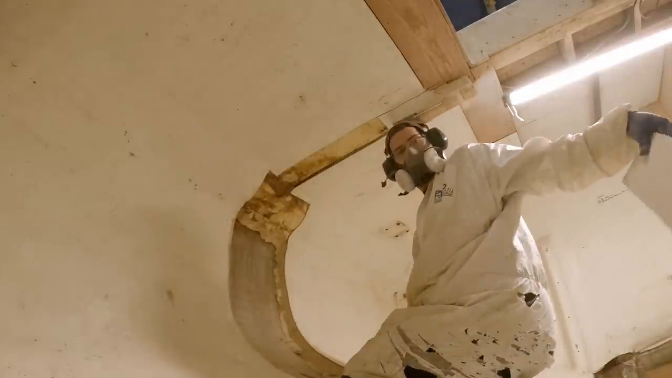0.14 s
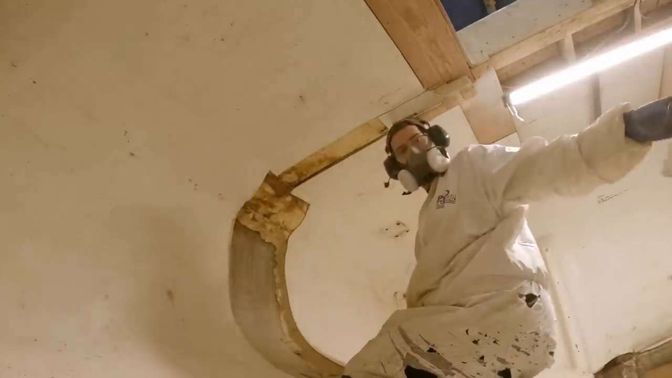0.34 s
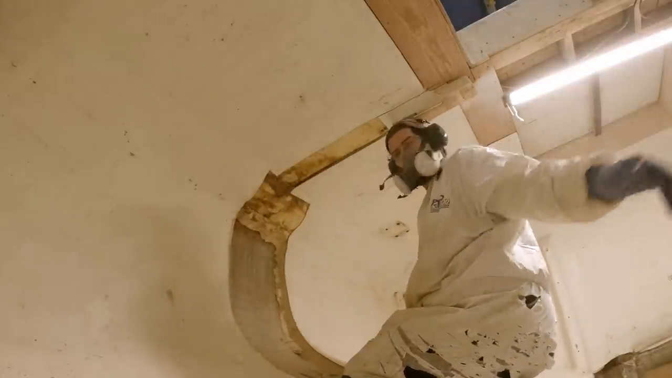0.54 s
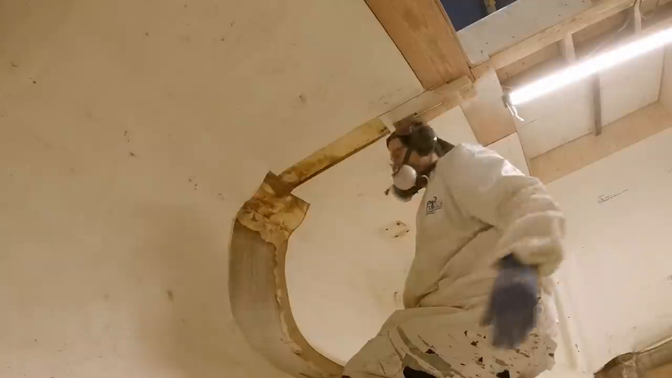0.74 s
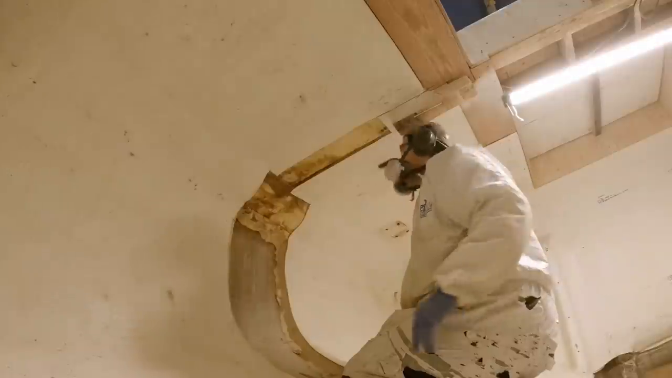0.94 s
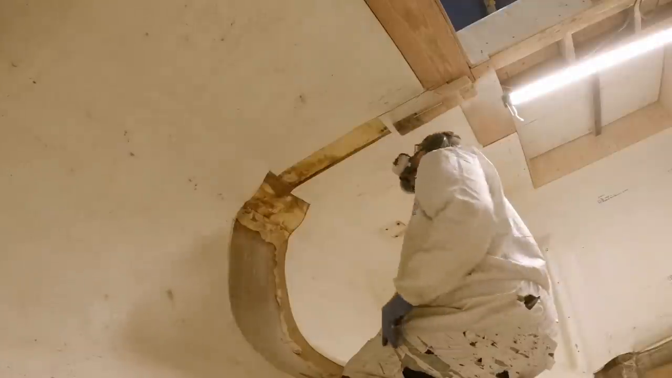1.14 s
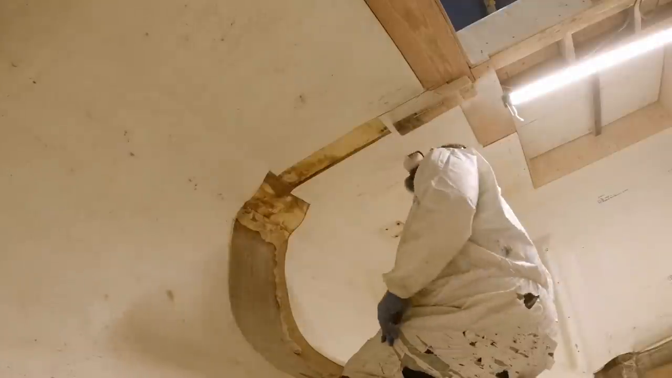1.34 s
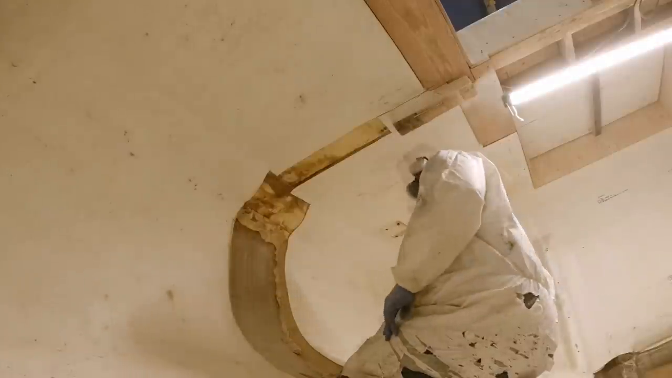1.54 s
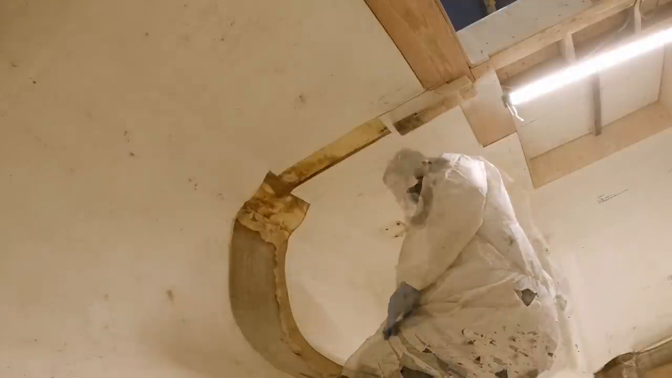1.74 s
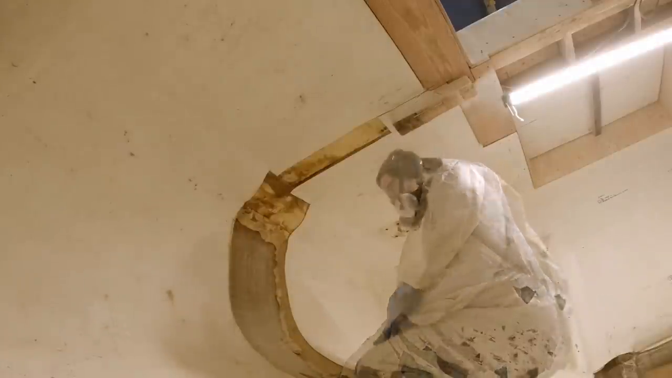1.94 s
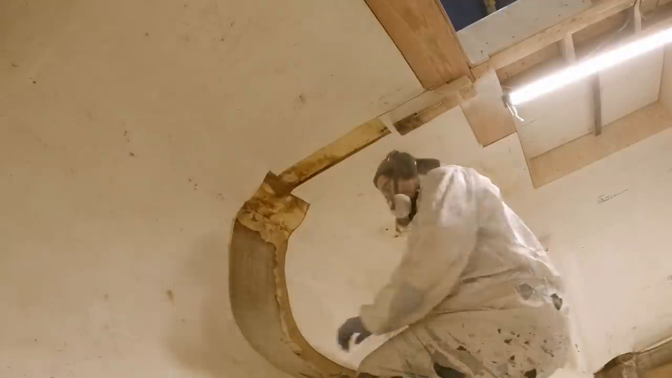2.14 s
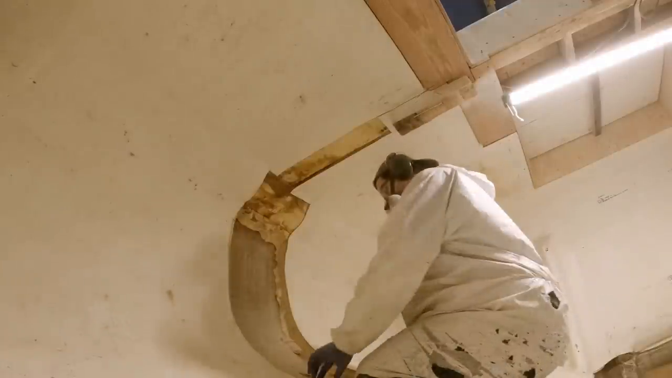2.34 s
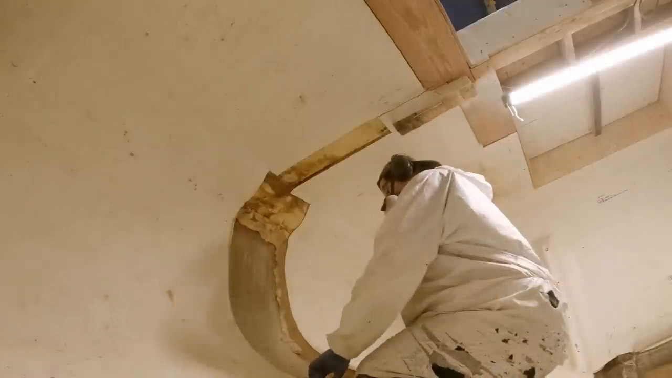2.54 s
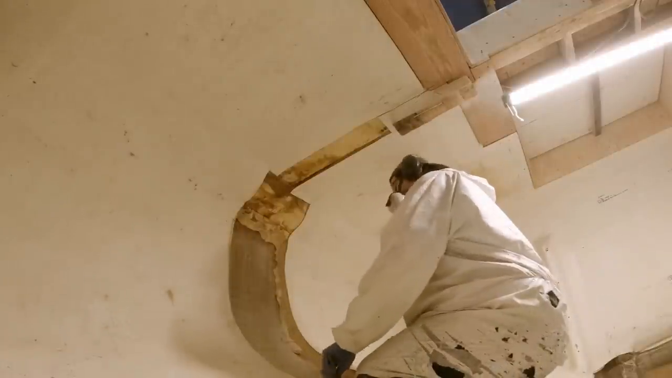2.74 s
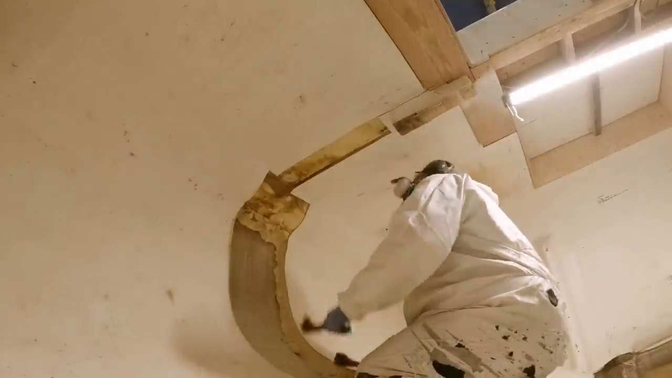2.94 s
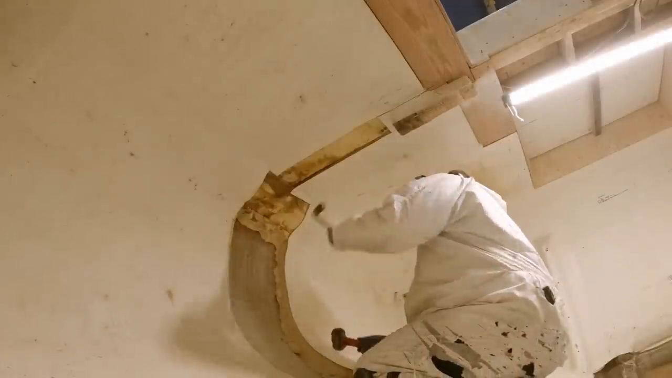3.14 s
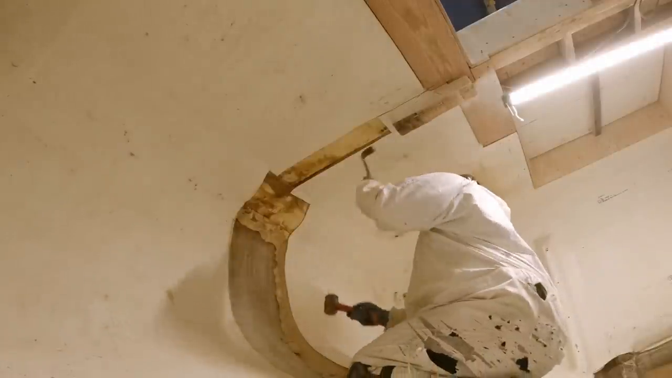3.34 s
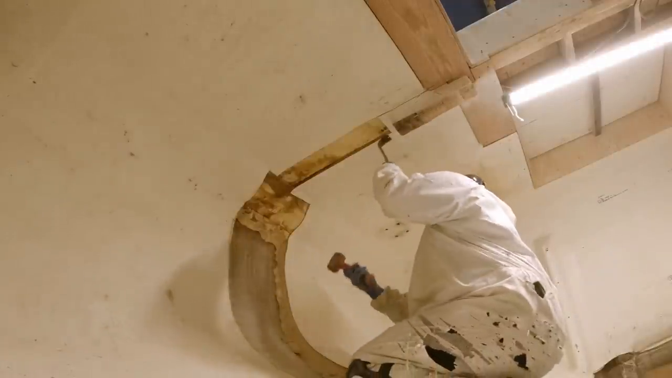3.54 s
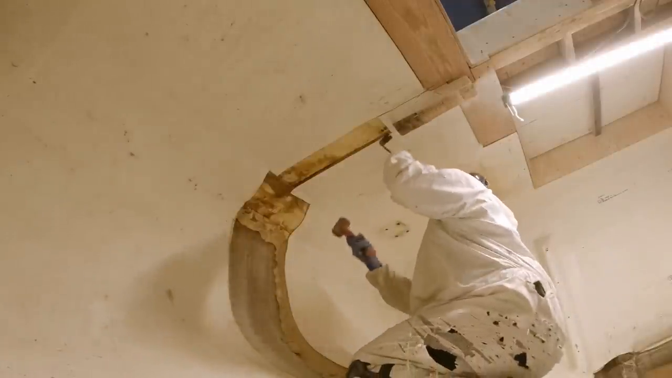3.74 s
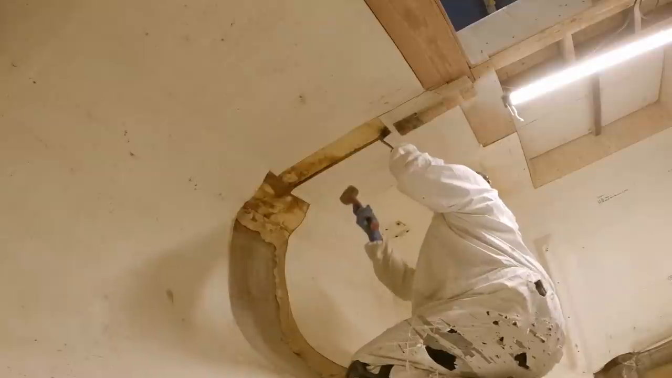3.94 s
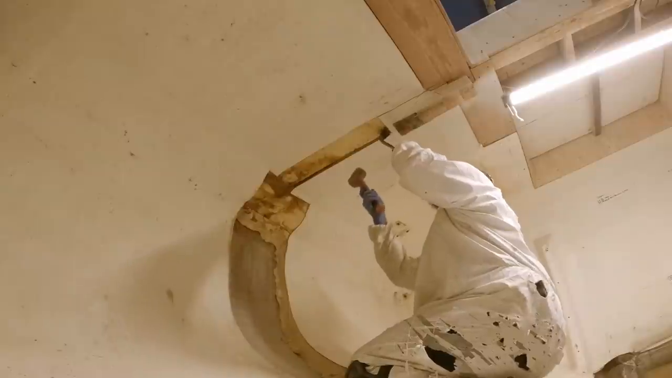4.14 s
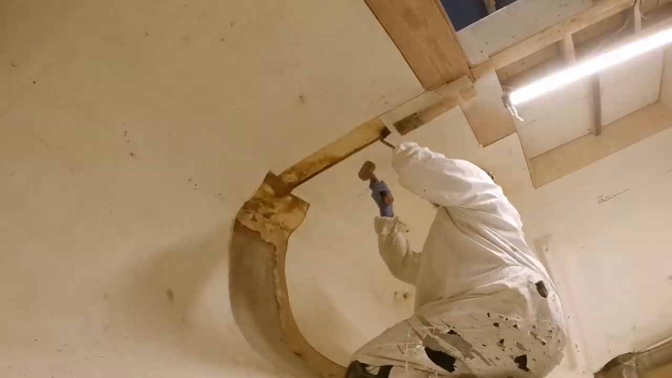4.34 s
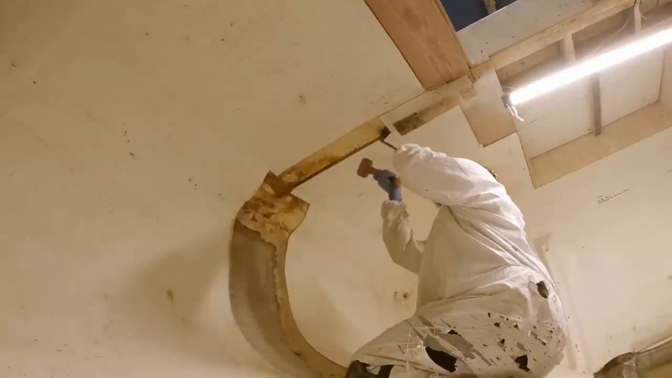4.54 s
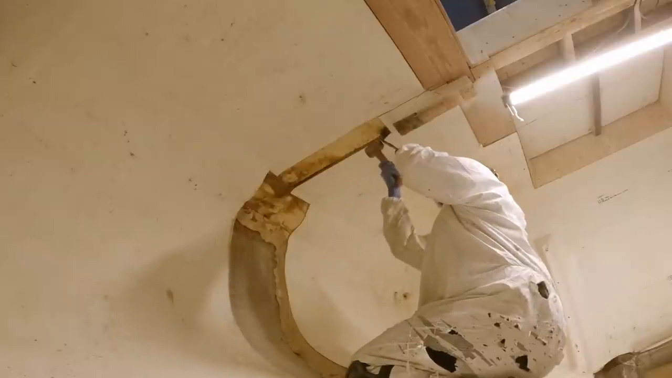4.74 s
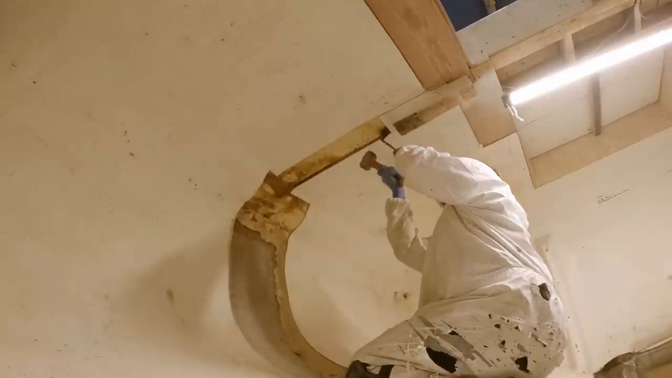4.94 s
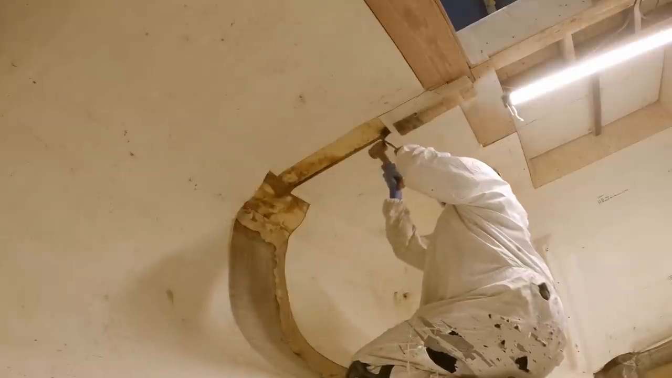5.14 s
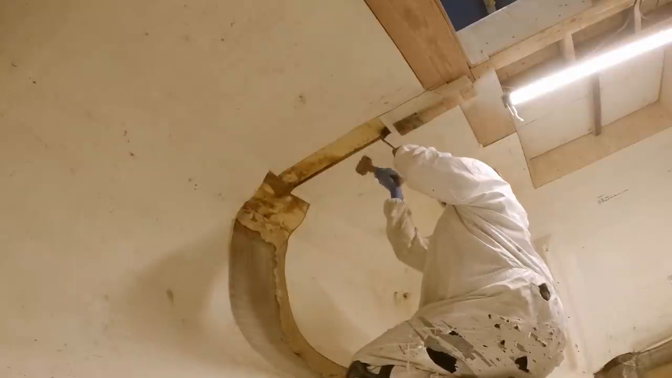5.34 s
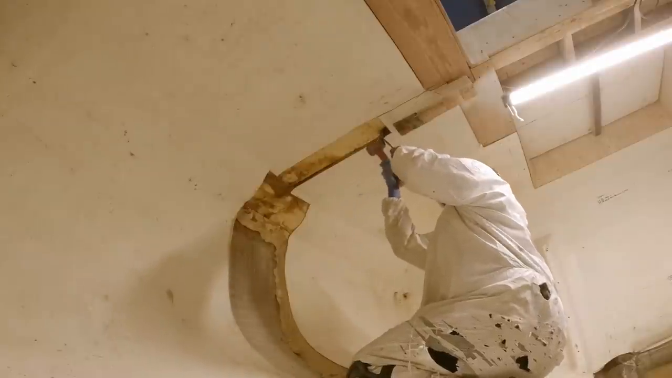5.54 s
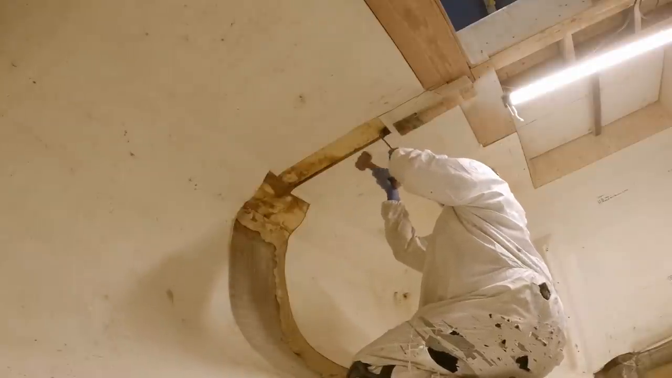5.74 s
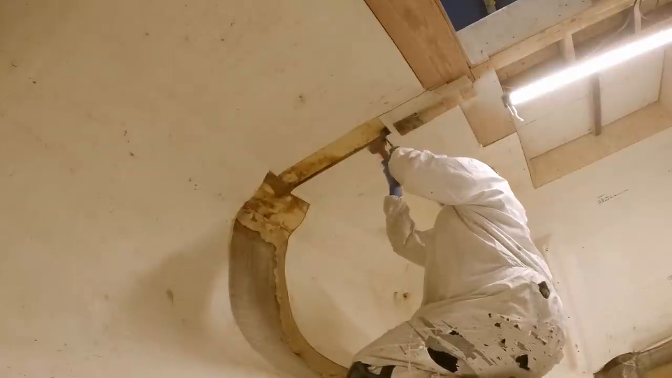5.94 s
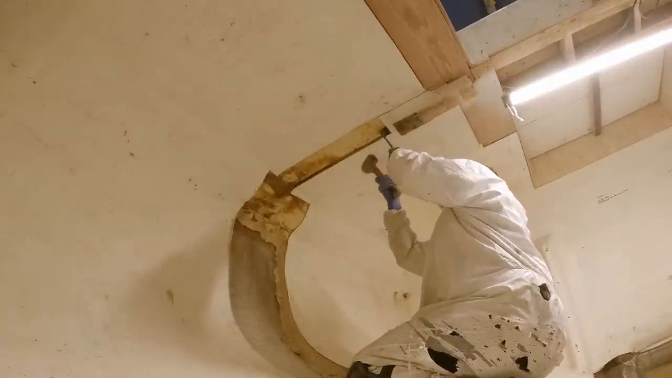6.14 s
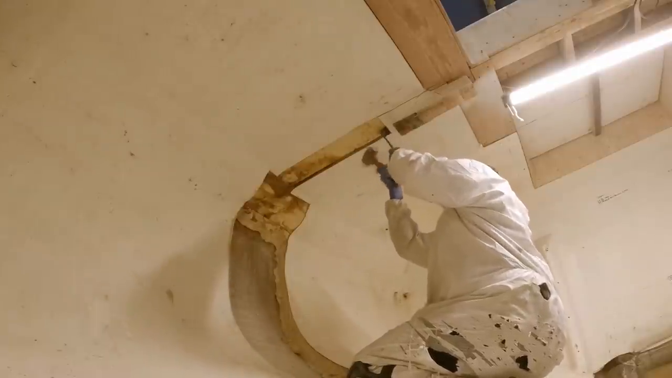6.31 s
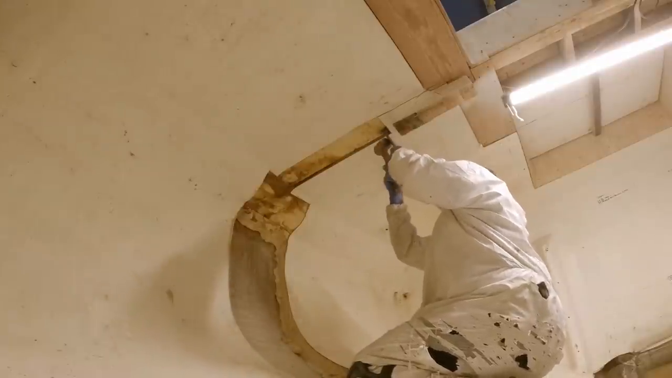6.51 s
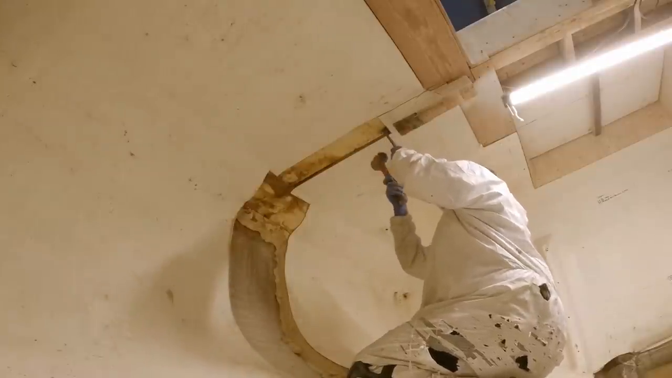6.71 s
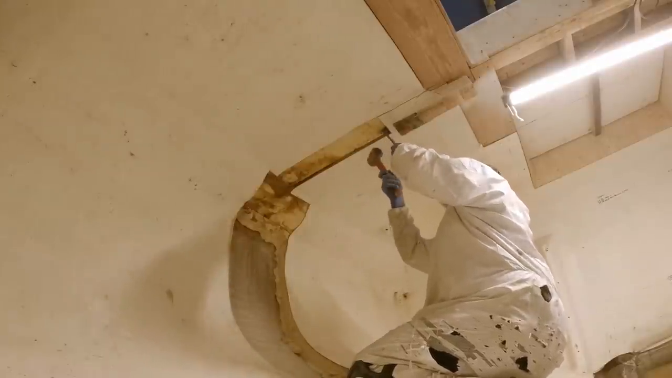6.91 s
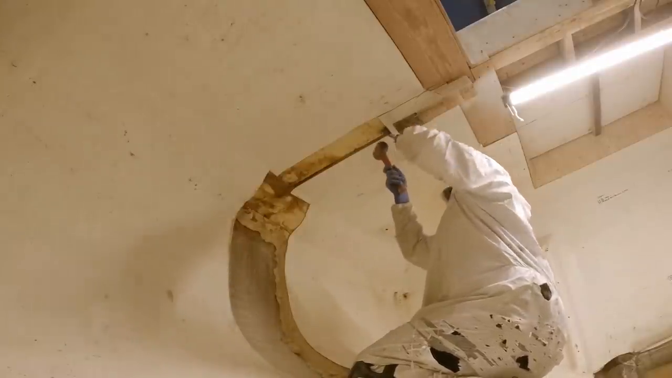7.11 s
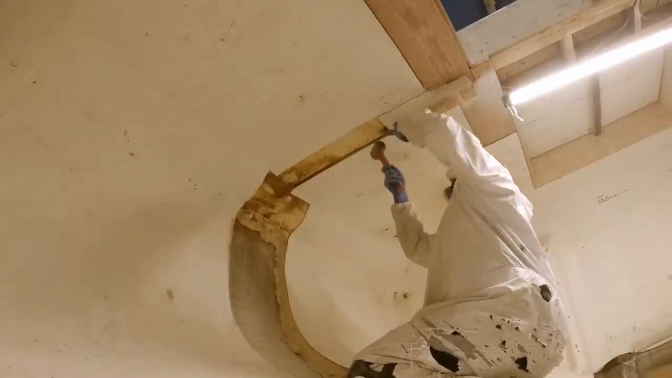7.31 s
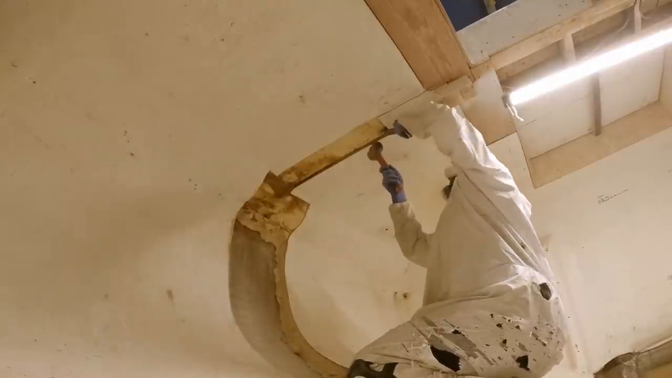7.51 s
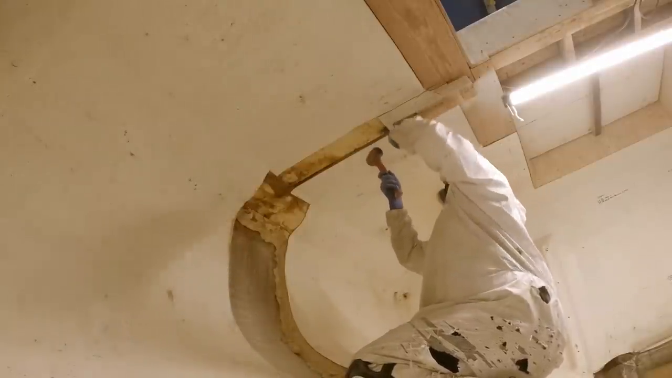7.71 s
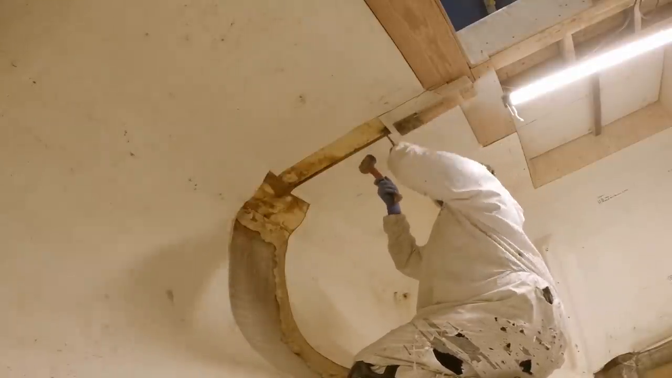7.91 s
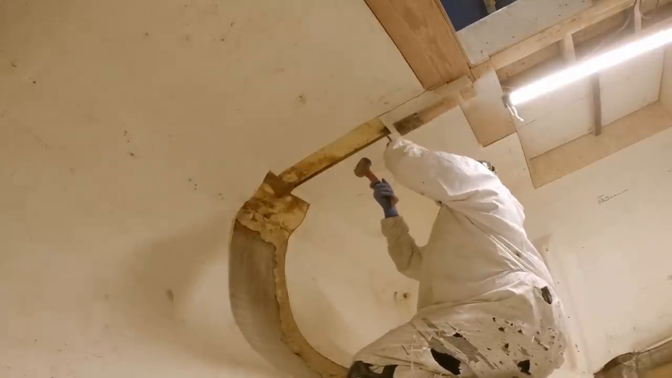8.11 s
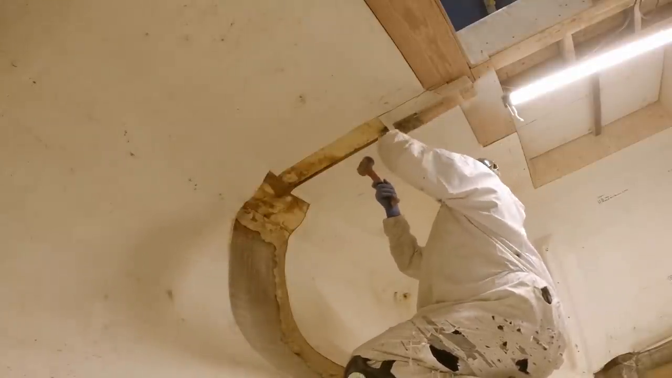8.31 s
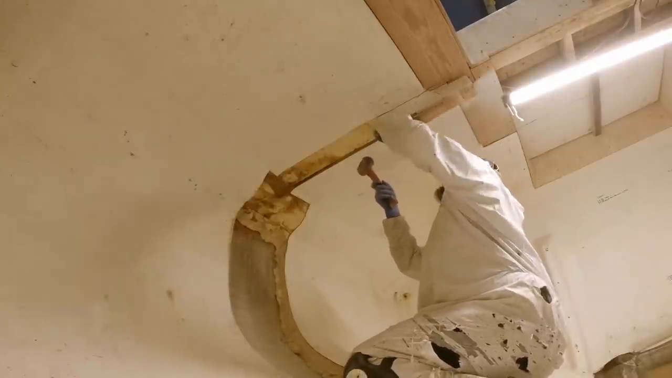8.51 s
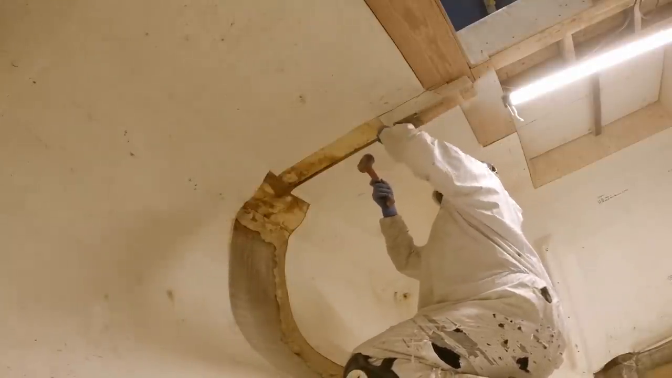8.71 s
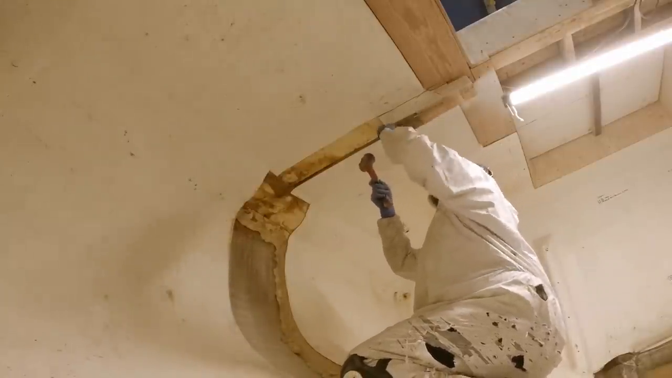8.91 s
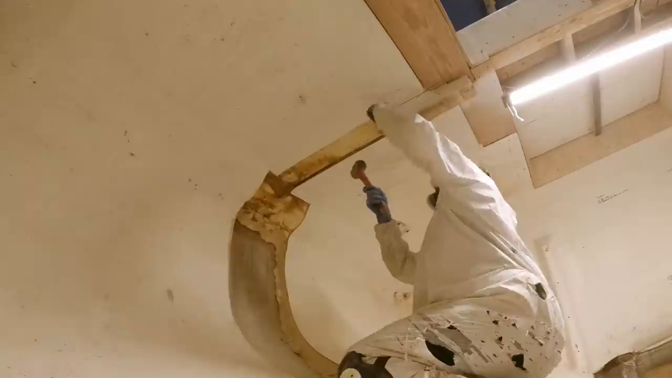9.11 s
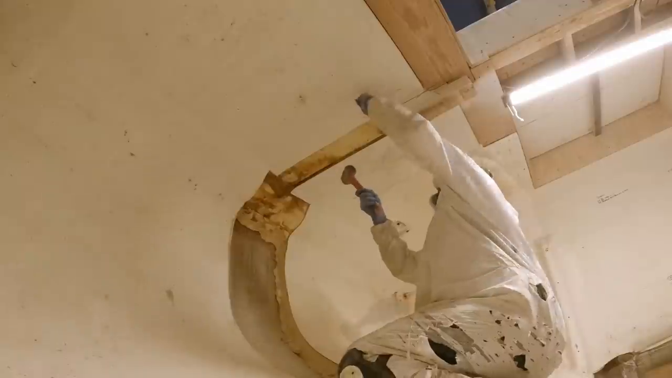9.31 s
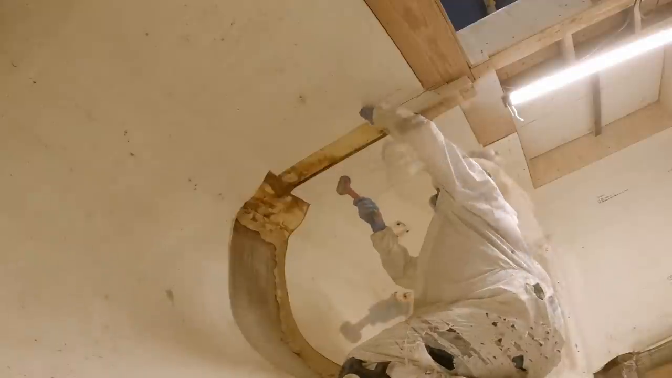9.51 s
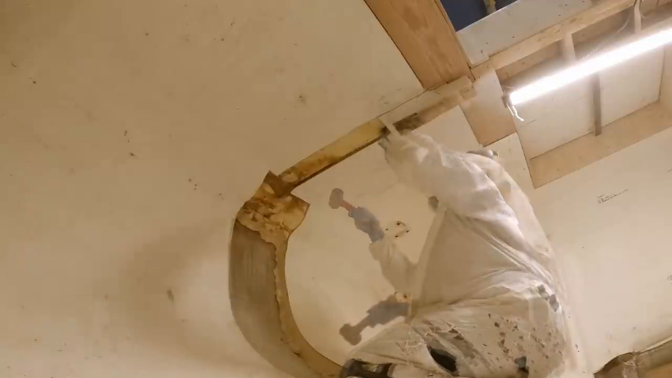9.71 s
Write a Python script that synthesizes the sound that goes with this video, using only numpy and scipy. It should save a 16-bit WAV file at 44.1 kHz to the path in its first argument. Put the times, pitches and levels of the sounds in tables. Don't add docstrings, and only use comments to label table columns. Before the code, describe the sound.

A low steady fan hum and thin rustle fill a hollow boat hull. A large light sheet slaps down with a boomy clatter, then dull bumps and a steel clink as tools are picked up. Five hard hammer blows on a chisel crack and ring, then gritty tearing, snaps and rips end with a slab landing. Close stereo microphone, loud tails squashed.

```python
import sys
import numpy as np
from scipy import signal
from scipy.fft import rfft, irfft, next_fast_len
from scipy.io import wavfile
from scipy.ndimage import uniform_filter1d

SR = 44100
rng = np.random.default_rng(int(sys.argv[2]) if len(sys.argv) > 2 else 0)


def bounce(signal):
    frames = np.transpose(np.atleast_2d(signal))
    limited = np.clip(frames, -1, 1)
    pcm = np.round(limited * 32767).astype(np.int16)
    wavfile.write(sys.argv[1], SR, pcm)


def makeup_ratio(level_db):
    decades = np.asarray(level_db, float) / 20
    return 10 ** decades


N = 434826


def evened(x):
    return x / np.sqrt(np.mean(x ** 2) + 1e-20)


def read(points, hz):
    f, value = np.transpose(points)
    return np.interp(np.log(hz + 1), np.log(f + 1), value)


def resonances(peaks, hz):
    return sum(makeup_ratio(db) / (1 + ((hz - f) / width) ** 2) for f, width, db in peaks)


def add(mix, s, sound):
    part = mix[..., round(s * SR):][..., :sound.shape[-1]]
    part += sound[..., :part.shape[-1]]


def coloured(x, gain):
    log_gain = np.log(gain(abs(np.fft.fftfreq(8192, 1 / SR))) + 1e-5)
    taps = np.fft.ifft(np.exp(np.conj(signal.hilbert(log_gain)))).real[:4096]
    return signal.oaconvolve(x, taps)


def burst(rise_s, decay_s, gain, wet_db):
    t = np.arange(10000) / SR
    push = rng.standard_normal(len(t)) * (1 - np.exp(-t / rise_s)) * np.exp(-t / decay_s)
    z = rfft(push, 2 * len(t))
    z /= np.sqrt(uniform_filter1d(abs(z) ** 2, size=140))
    push = irfft(z)[:len(t)]
    pulse = coloured(np.ones(1), gain)
    sound = signal.fftconvolve(push, pulse)[:len(t)]
    pulse = np.pad(pulse, (0, len(t) - len(pulse)))
    pulse = makeup_ratio(wet_db) * np.linalg.norm(push) * pulse
    return np.array([sound, pulse]) / abs(sound).max()


def ring(modes, seconds):
    t = np.arange(round(seconds * SR)) / SR
    return sum(makeup_ratio(db - 60 * t / t60) * np.sin(2 * np.pi * (hz * t + rng.random())) for hz, db, t60 in modes)


# pitch in Hz, left-right correlation.
LIKENESS = [(60, 1.0), (120, 1), (350, 0.97), (520, 0.82), (950, 0.79), (1890, 0.68), (3770, 0.67),
            (7520, 0.69), (15000, 0.1)]


def likeness(hz):
    ceiling = 1 - .017 * np.minimum(hz / 90, 1) ** 2
    return np.clip(read(LIKENESS, hz), 0, ceiling)[:, None]


def wash(gain, level_db, tilt_db, patchy_db):
    frames, hz = N // 512 + 5, np.fft.rfftfreq(2048, 1 / SR)
    a, b, c, d, patches = rng.standard_normal((frames, 1025, 5)).T
    patches = uniform_filter1d(patches, size=16, axis=0)
    patches = evened(uniform_filter1d(patches, size=6, axis=1))
    same, left = likeness(hz), a + 1j * b
    right = same * left + np.sqrt(1 - same ** 2) * (c + 1j * d)
    z = np.array([left, right])
    octaves = np.log2(np.maximum(hz, 1500) / 1500)[:, None]
    tilt_db = tilt_db[np.minimum(np.arange(frames) * 512, N - 1)]
    z *= gain(hz)[:, None] * makeup_ratio(patchy_db * patches + tilt_db * octaves)
    noise = signal.istft(z, nperseg=2048, noverlap=1536)[1][:, :N]
    return makeup_ratio(level_db) * evened(noise)


# pitch in Hz, level in dB per Hz.
HUM = [(18, -43), (30, -28.5), (69, 7), (99, -17.5), (140, 4.5), (161, 1), (177, -26), (200, -4),
       (264, -2.5), (427, -8.5), (1200, -20), (1560, -46), (2640, -120)]
# pitch in Hz, width in Hz, level in dB.
AIR_MODES = [(50.9, 11.7, 8.5), (76.4, 7.4, 4), (126.3, 15.8, 3.5), (152, 17, -5), (207.3, 6.9, 5.5),
             (288, 17, -11.5), (306, 106, -6.5)]
# time in seconds, fan level in dB.
GAIN = [(0.0, -36), (0.66, -39.5), (0.9, -34), (1.15, -38.5), (1.5, -44), (1.85, -42.5), (2.6, -36),
        (2.85, -36.5), (3.2, -36.5), (3.8, -35.5), (4.2, -36), (4.75, -37.5), (5.1, -44), (5.6, -44.5),
        (6.95, -47), (7.5, -41), (8.75, -37.5), (9.86, -38.5)]
# pitch in Hz, level in dB per Hz.
RUSTLE = [(290, -23), (500, -12), (718, -5.5), (819, -5.5), (1140, -1), (1620, -7.5), (3150, -13.5),
          (3700, -13), (3980, -14.5), (6330, -20), (12100, -32.5), (14000, -46), (16000, -55)]
# middle in seconds,
# half length in seconds, added rustle in dB, added brightness in dB per octave.
SHUFFLES = [
    (0.97, 0.11, 26, -3),
    (1.35, 0.22, 5.5, 2.5),
    (2, 0.59, 1, 3.5),
    (3.247, 0.3, 1.5, 2.3),
    (4.902, 0.13, 1, 7),
    (6.63, 0.2, 22, 3),
    (7.915, 0.26, -1, 9),
    (9.462, 0.11, 33, -21),
    (9.587, 0.31, 0, 4.5),
    (9.85, 0.14, -3, -2),
]


def air():
    t = np.arange(N) / SR
    hum_db = np.interp(t, *np.transpose(GAIN))
    rustle_db = -49 + hum_db + 37
    bright_db = np.full(N, -0.12)
    for middle_s, half_s, more_db, tilt_db in SHUFFLES:
        move = np.maximum(1 - abs(t - middle_s) / half_s, 0)
        rustle_db = rustle_db + more_db * move
        bright_db += tilt_db * move
    fan = lambda hz: makeup_ratio(read(HUM, hz)) * (0.54 + 0.89 * resonances(AIR_MODES, hz))
    hum = wash(fan, hum_db, np.zeros(N), 1.0)
    return hum + wash(lambda hz: makeup_ratio(read(RUSTLE, hz)), rustle_db, bright_db, 0.96)


# start in seconds, rise in seconds, hold in seconds, effort in dB,
# brightness in dB.
PULLS = [(0.304, 0.047, 0.083, -48, 5.5), (6.986, 0.02, 0.046, -56, 2), (7.069, 0.008, 0.09, -51, 4.5),
         (7.135, 0.062, 0.049, -42, 6.5), (7.218, .015, 0.21, -41.5, 4), (7.5, 0.019, 0.054, -55, 6),
         (7.713, 0.032, 0.17, -33, 1.5), (7.936, 0.018, 0.06, -44.5, 2), (8.014, 0.019, 0.041, -40, 0.5),
         (8.127, 0.034, 0.097, -40, 0.5), (8.3, 0.014, 0.073, -47, 4), (8.406, 0.12, 0.062, -42, 4.5),
         (8.76, 0.039, 0.055, -39.5, -2), (8.938, .012, 0.14, -48.5, 7), (9.08, 0.03, 0.056, -32, -2),
         (9.199, 0.027, 0.076, -33, 3.5), (9.344, 0.0078, 0.1, -28.5, 8.5), (9.452, 0.027, 0.049, -22, -10),
         (9.658, 0.052, 0.027, -33, -0.5), (9.737, 0.03, 0.05, -37.5, 15)]
# pitch in Hz, level in dB per Hz.
TEAR = [(240, -52), (400, -6), (753, -17.5), (1090, -5), (1230, -11), (1510, -13.5), (1680, -12.5),
        (2320, -11), (4730, -17.5), (6640, -9.5), (8240, -22.5), (12300, -29.5), (16000, -54)]
# pitch in Hz, width in Hz, level in dB.
LAMINATE = [(4980, 450, -14), (3760, 170, -24), (6400, 440, -27)]
# lower edge in Hz, upper edge in Hz.
TEAR_BANDS_HZ = [(1900, 4300), (500, 1900), (4300, 8200), (8200, 16000)]
PULL_SAG_DB_PER_S, PULL_RELEASE_DB_PER_S = 20, 246
CLUMP_DB, CLUMP_S = 2.3, .012
BAND_DB, BAND_FOLLOW = [-3, -3, -8.5], [-0.076, 0.99, 0.87]


def peeling():
    dry = np.zeros((2, N))
    breaks = rng.random(N) < 2500 / SR
    strength = makeup_ratio(3 * rng.exponential(1, N).clip(0, 2.5))
    grit = rng.standard_normal(N) * (0.45 + strength * breaks)
    grit = coloured(grit, lambda hz: makeup_ratio(read(TEAR, hz)) + resonances(LAMINATE, hz))[:N]
    clumps = rng.standard_normal((N, len(TEAR_BANDS_HZ)))
    clumps = uniform_filter1d(clumps, size=round(CLUMP_S * SR), axis=0).T
    shared = .5 * clumps.sum(0)
    bands = []
    for edges, clump in zip(TEAR_BANDS_HZ, clumps):
        band = signal.sosfilt(signal.butter(3, edges, "band", fs=SR, output="sos"), grit)
        bands.append(evened(band) * makeup_ratio(CLUMP_DB * evened(clump + shared)))
    for s, rise, hold, effort_db, bright_db in PULLS:
        at = np.arange(round(s * SR), min(round((s + 1) * SR), N))
        t = at / SR - s
        fade_db = PULL_SAG_DB_PER_S * np.maximum(t - rise, 0)
        fade_db += PULL_RELEASE_DB_PER_S * np.maximum(t - rise - hold, 0)
        tear = bands[0][at]
        for db, follow, band in zip(BAND_DB, BAND_FOLLOW, bands[1:]):
            tear = tear + makeup_ratio(db + follow * bright_db) * band[at]
        swell = np.clip(t / rise, 0, 1) ** 2
        dry[:, at] += makeup_ratio(effort_db - 5.5 - fade_db) * swell * tear * makeup_ratio([[0], [-3]])
    return dry


# time in seconds, peak in dB, body in Hz, bass in dB, contact in seconds.
BUMPS = [(0.8091, 0.5, 1020, 1.5, 0.0041), (1.228, -36.5, 1250, -21, 0.023), (2.248, -31, 650, 1, 0.003),
         (2.63, -32.5, 790, -2, 0.082), (2.656, -27, 710, -25, 0.006), (2.66, -17, 590, 1.5, 0.041),
         (2.754, -20, 1290, -34, 0.0079), (3.049, -26.5, 1300, -23, 0.01), (3.06, -29.5, 1250, -19, 0.02),
         (3.15, -28.5, 1600, 4.5, 0.038), (4.009, -24.5, 1120, -3, 0.0043), (4.018, -19.5, 453, 15, 0.018),
         (4.661, -39.5, 1330, -12, 0.1), (9.351, -15, 1300, -9, 0.014)]
# time in seconds, peak in dB, body in Hz, bass in dB,
# contact in seconds.
TAPS = [(1.34, -38, 905, -13, 0.05), (0.36, -41.5, 1780, -30, 0.03), (0.43, -44, 1590, -30, 0.018),
        (1.385, -35, 985, -8, 0.045), (1.39, -43.5, 1250, -20, 0.05), (1.40, -55, 865, -19, 0.055),
        (2.462, -29.5, 152, -55, 0.038), (2.765, -17.5, 1120, -5, 0.0069),
        (9.1925, -14.5, 1133, -18.5, 0.0047), (9.194, -31, 1520, -22, 0.0052),
        (9.36, -19, 1700, -32, 0.044), (9.37, -16.5, 930, -33, 0.045)]
# pitch in Hz, gain in dB.
TREBLE = [(4000, 0.5), (7800, 8), (8400, 11), (12500, 5), (16000, -46)]
BUMP_WIDTH, TAP_WIDTH = 0.41, 0.097


def knocks():
    dry = np.zeros((2, N))
    for rows, share in (BUMPS, BUMP_WIDTH), (TAPS, TAP_WIDTH):
        for s, db, body_hz, bass_db, contact_s in rows:
            body = [(body_hz, share * body_hz, 0), (150, 300, bass_db)]
            gain = lambda hz: resonances(body, hz) * makeup_ratio(read(TREBLE, hz))
            add(dry, s - .001, makeup_ratio(db) * burst(0.24 * contact_s, contact_s, gain, 0.44))
    return dry


# time in seconds, peak in dB, centre in Hz.
SNAPS = [(0.38, -40, 1800), (0.4295, -39, 3860), (1.498, -44.5, 8900), (4.3208, -30, 5160),
         (4.3485, -50, 4740), (5.972, -39, 7500), (6.9956, -50, 3470), (7.0686, -45, 7000),
         (7.1185, -43, 4940), (7.1584, -36, 4000), (7.1868, -39, 3770), (7.2013, -36, 3790),
         (7.2307, -18, 4760), (7.304, -41, 6000), (7.363, -38, 9000), (7.388, -26.5, 4800),
         (7.524, -43, 3700), (7.5714, -42.5, 3760), (7.631, -45, 3000), (7.641, -40, 1800),
         (7.707, -42, 4830), (7.7296, -33, 4800), (7.743, -29, 4700), (7.867, -26, 4640),
         (7.897, -38, 6000), (7.945, -24.5, 4270), (8.1635, -44, 9000), (8.185, -42, 8000),
         (8.2182, -22.5, 5430), (8.2888, -33.5, 7050), (8.3195, -28, 3760), (8.358, -37, 7000),
         (8.443, -28.5, 5160), (8.466, -31.5, 6600), (8.547, -30, 6800), (8.574, -41, 6540),
         (8.7647, -44, 6000), (8.7946, -50, 2500), (8.811, -27, 6360), (8.849, -36, 4550),
         (8.9383, -10, 7400), (9.105, -22.5, 6570), (9.114, -21, 3940), (9.149, -30, 3590),
         (9.154, -25, 5500), (9.212, -33, 4140), (9.226, -24, 4900), (9.2677, -18, 6200),
         (9.3516, -18.5, 3500), (9.714, -34, 2440), (9.752, -26, 5100)]


def snaps():
    dry = np.zeros((2, N))
    for s, db, centre_hz in SNAPS:
        gain = lambda hz: resonances([(centre_hz, 1700, 0)], hz) * makeup_ratio(read(TEAR, hz) * 0.03)
        add(dry, s - .001, makeup_ratio(db) * burst(0.00031, 0.0025, gain, -0.44))
    return dry


# time in seconds, peak in dB, bloom in seconds, clatter length in seconds,
# force in dB swallowed by the limiter.
FALLS = [
    (0.815, -8, 0.026, 0.025, 9.5),
    (9.35, -18, 0.011, 0.035, 19),
]
# pitch in Hz, level in dB per Hz.
LANDING = [
    [(21, -16), (35, -28), (60, -1.5), (97, -14.5), (136, 0.5), (190, -13.5), (290, -9.5), (380, -14.5),
     (600, -11), (1000, -16), (2200, -20), (4440, -31.5), (12100, -44), (16000, -67)],
    [(21, -56), (60, -2), (100, -4.5), (150, 7), (200, -4.5), (410, -7.5), (758, -22), (1050, -0.5),
     (1370, -27), (1720, -15), (6690, -30.5), (12400, -41), (14100, -57), (16000, -99)],
]


def falls():
    dry = np.zeros((2, N))
    for (s, db, bloom_s, length_s, force_db), colour in zip(FALLS, LANDING):
        gain = lambda hz: makeup_ratio(read(colour, hz)) + resonances([(150, 34, -7)], hz)
        clatter = burst(bloom_s, length_s, gain, 0)[0]
        add(dry, s - .001, makeup_ratio(db + force_db) * clatter * makeup_ratio([[-3], [3]]))
    return dry


# time in seconds, peak in dB, centre
# in Hz, length in seconds.
RIPS = [(7.23, -23, 4900, .006), (7.243, -29, 4800, .006), (7.74, -26, 4700, 0.027),
        (7.746, -30.5, 1100, .03), (7.765, -26, 4700, .008), (7.866, -25, 2300, .004),
        (7.901, -29, 2800, .015), (7.948, -26, 3300, .004), (7.257, -29, 3200, 0.013),
        (7.302, -31, 2300, 0.0036), (7.39, -35, 2400, .004), (8.034, -28.5, 4700, .008),
        (8.047, -26.5, 4450, .01), (8.078, -33, 3800, .004), (8.088, -30, 4500, .003),
        (8.202, -33, 4300, .004), (8.32, -35, 2200, .003), (8.937, -25, 2880, 0.0031),
        (9.118, -25, 6800, 0.0027), (9.136, -31, 5000, .004), (9.194, -28, 3000, .003),
        (9.263, -23.5, 1150, .01), (9.221, -30, 1160, .016), (2.673, -28, 1130, .02),
        (2.787, -28, 1400, 0.022), (9.376, -20, 2430, .006), (9.435, -24, 5000, .008),
        (9.484, -27, 3600, .03), (9.532, -22.5, 2600, .02), (9.58, -30, 3400, 0.026),
        (9.629, -37, 3000, .025), (9.7335, -26.5, 2390, .014), (2.611, -40, 5400, 0.0046),
        (2.249, -36, 900, 0.0033)]


def rips():
    dry = np.zeros((2, N))
    for s, db, centre_hz, length_s in RIPS:
        gain = lambda hz: resonances([(centre_hz, 0.27 * centre_hz, 0)], hz)
        add(dry, s - .001, makeup_ratio(db) * burst(0.17 * length_s, length_s, gain, -2.4))
    return dry


# time in seconds, peak in dB, seconds until a hand damps them.
CLINKS = [
    (2.604, -40, 0.085),
    (2.7565, -23, 0.12),
]
STEEL_HZ = [1136, 1900, 2627, 3182, 4027, 5173, 5367, 6304, 7359, 9100, 10000, 11470, 12000, 12600]
# level at first touch in dB, level at second touch in dB, t60 in seconds.
STEEL = [(-12, -2, 1.0), (-6, -9, 4.0), (-30, -24, .5), (-14, -17, 1.8), (-4, -2, 0.45), (-4, -9, 0.6),
         (-3, -13, 0.2), (-9, -17, 0.6), (-30, -9, 0.45), (-35, -30, 0.25), (-26, -34, .2), (-35, -38, .3),
         (-40, -42, .2), (-40, -38, .3)]
HAND_DB, HAND_S = -9, .03


def clinks():
    dry = np.zeros((2, N))
    for touch, (s, db, held_s) in enumerate(CLINKS):
        tones = ring([(hz, mode[touch], mode[2]) for hz, mode in zip(STEEL_HZ, STEEL)], 0.28)
        t = np.arange(len(tones)) / SR
        tones *= makeup_ratio(HAND_DB * np.clip((t - held_s) / HAND_S, 0, 1))
        add(dry, s, makeup_ratio(db - 6.5) * tones * makeup_ratio([[0], [-8]]))
        add(dry, s, makeup_ratio(db - 1) * burst(0.0011, 0.0042, lambda hz: makeup_ratio(read(RUSTLE, hz)), 4.6))
    return dry


# time in seconds, crack peak in dB, thump in dB, thump tilt in dB per octave,
# boom in dB.
BLOWS = [
    (4.824, -3, -11.5, -0.5, -44),
    (5.247, -5.5, -16.5, -1.3, -25),
    (5.6413, -5, -18.5, -2.1, -23.5),
    (6.046, -7, -22, 1.6, -19),
    (6.479, -6.5, -18.5, 0.5, -17),
]
# pitch in Hz, width in Hz, level in dB.
BITES = [
    [(1250, 34, -1), (1925, 76, 2.5), (3280, 490, -4.5), (4200, 100, -11), (4650, 40, -23),
     (5200, 170, 8.5), (5620, 76, -11), (6100, 61, -9), (6360, 170, -2), (7140, 130, -5), (7300, 53, -2)],
    [(1100, 110, -2), (1780, 92, -7), (2200, 130, -3), (2710, 42, -5), (2960, 53, -2), (3230, 46, -5),
     (4080, 510, 0), (5650, 210, 3), (7360, 67, -3), (8000, 42, -18)],
    [(1120, 120, -15), (2200, 67, -22), (2580, 48, -15), (3034, 110, -0.5), (3850, 230, -7.5),
     (4640, 99, -8), (4940, 120, -5), (5550, 59, -2), (6260, 100, -6), (7200, 160, -8), (7800, 57, -9)],
    [(1076, 110, 2), (1800, 100, -4), (2690, 51, -1), (3000, 45, -4), (3370, 190, -6), (4060, 280, 5.5),
     (5160, 110, -17), (5900, 47, -4), (7210, 110, -20), (7500, 170, -22), (7960, 190, -24)],
    [(1174, 130, 3), (2270, 74, -1), (3000, 120, 4.5), (3400, 23, -2), (3880, 210, 3.5), (4430, 110, -1),
     (5300, 94, 6), (6400, 54, -19), (6940, 180, -8), (7400, 100, -18), (7800, 31, -22)],
]
# pitch in Hz, width in Hz, level in dB.
GLINTS = [
    [(9170, 48, 4), (9930, 110, 1), (12300, 140, -3), (11600, 170, -3), (13200, 170, -19), (13900, 74, -20)],
    [(8500, 56, -11), (9330, 46, -4), (9900, 210, 0), (11200, 72, -5), (12000, 59, -5), (14000, 54, -10)],
    [(9000, 160, -10), (9900, 130, -9), (10250, 66, -4), (11870, 56, 1), (12700, 40, -16), (13600, 45, -12)],
    [(10200, 42, 6), (11300, 87, -23), (12000, 46, -15), (12900, 31, -28), (13200, 61, -25),
     (13800, 140, -12)],
    [(10100, 110, -4), (10500, 48, -11), (10900, 68, -15), (12300, 66, -11), (13200, 110, -18),
     (13700, 110, -17)],
]
# pitch in Hz, width in Hz, level in dB.
PANELS = [
    (152, 34, 12),
    (128, 60, 0),
    (144, 140, -14),
    (314, 30, -19),
    (310, 32, -12),
]
# pitch in Hz, level in dB per Hz.
CRACK = [(560, -79), (950, -5), (1080, 4.5), (1890, -3), (3060, -6.5), (3530, -7.5), (4020, 7),
         (6670, -6.5), (7780, -3), (8600, -5.5), (12200, -18), (16000, -67)]
# pitch in Hz, level in dB per Hz.
THUMP = [(24, -34), (40, 10), (64, 3), (97, -7), (128, -5), (219, -18), (306, -20), (426, -20), (650, -23),
         (738, -23), (850, -70), (1100, -42), (1870, -120)]
# pitch in Hz, level in dB, t60 in seconds.
HULL = [(125.1, 10.5, 0.25), (143.6, -3, 0.58), (302, -8.5, 0.6)]
GLINT_DB = -13.5


def hammer():
    dry = np.zeros((2, N))
    swell = 1 - np.exp(-np.arange(SR) / SR / 0.012)
    for blow, bite, glint, panel in zip(BLOWS, BITES, GLINTS, PANELS):
        s, crack_db, thump_db, tilt_db, boom_db = blow
        edge = lambda hz: 0.51 * resonances(bite, hz) + makeup_ratio(GLINT_DB) * resonances(glint, hz)
        crack = burst(0.00057, 0.0035, lambda hz: 0.24 * makeup_ratio(read(CRACK, hz)) + edge(hz), 9.2)
        tilted = lambda hz: makeup_ratio(read(THUMP, hz) + tilt_db * np.log2((hz + 1) / 120))
        thump = burst(0.01, 0.042, lambda hz: tilted(hz) + resonances([panel], hz), 6.65)
        add(dry, s - .0007, makeup_ratio(crack_db - 1.5) * crack)
        add(dry, s, makeup_ratio(thump_db) * thump)
        add(dry[0], s, makeup_ratio(boom_db) * swell * ring(HULL, 1))
    return dry


RING_DB, RING_T60_S, GLINT_RING_DB, GLINT_T60_S = -44, 0.44, -50, .45


def chisel():
    dry = np.zeros((2, N))
    for blow, bite, glint in zip(BLOWS, BITES, GLINTS):
        modes = [(hz, db + RING_DB, RING_T60_S) for hz, _, db in bite]
        modes += [(hz, db + GLINT_RING_DB, GLINT_T60_S) for hz, _, db in glint]
        add(dry, blow[0], ring(modes, .5) * makeup_ratio([[0], [-3]]))
    return dry


DRONE_HZ, DRONE_DB, DRONE_SAG_DB_PER_S = 48.6, -31.5, 8


def drone():
    t, struck = np.arange(N) / SR, np.transpose(BLOWS)[0]
    since = t - struck[np.maximum(np.searchsorted(struck, t) - 1, 0)]
    level = makeup_ratio(DRONE_DB - DRONE_SAG_DB_PER_S * since) * (since > 0)
    level = uniform_filter1d(level, size=900)
    return level * np.sqrt(2) * np.sin(2 * np.pi * DRONE_HZ * t)


# pitch in Hz, t60 in seconds.
ROOM = [(60, 0.65), (250, 0.57), (1000, 0.5), (4000, 0.56), (5200, 0.51), (8000, 0.44), (14000, 0.29)]


def hull_tail():
    hz, t, z = signal.stft(rng.standard_normal((2, SR)), SR, nperseg=512)
    same = likeness(hz) ** 1.33
    z[1] = same * z[0] + np.sqrt(1 - same ** 2) * z[1]
    z = z * makeup_ratio(-60 * t / read(ROOM, hz)[:, None])
    tail = signal.istft(z, SR, nperseg=512)[1]
    tail *= 1 - np.exp(-np.arange(tail.shape[1]) / SR / 0.00067)
    return tail / np.linalg.norm(tail[0])


# delay left in seconds, delay right in seconds, level in dB.
ECHOES = [(.0043, 0.0042, -7.5), (.0071, .0066, -13.5)]


def room(direct, radiated, tail):
    out = direct + signal.fftconvolve(radiated[None], tail, axes=1)[:, :N]
    treble = signal.sosfilt(signal.butter(2, 1500, "high", fs=SR, output="sos"), direct)
    for left_s, right_s, db in ECHOES:
        add(out[0], left_s, makeup_ratio(db) * treble)
        add(out[1], right_s, makeup_ratio(db) * treble)
    return out


def scene():
    tearing = peeling() + snaps() + rips()
    handling = knocks() + falls() + clinks()
    striking = hammer() + chisel()
    direct, radiated = tearing + handling + striking
    return room(direct, radiated, hull_tail()) + drone() + air()


# pitch in Hz, left minus right in dB.
LEAN = [(60, 0), (180, 0.5), (550, 1.5), (1650, 2.3), (4970, 1.2), (9000, 2.8), (15000, 1.5)]


def ports(dry):
    size = next_fast_len(N)
    hz = np.fft.rfftfreq(size, 1 / SR)
    colour = makeup_ratio(read(LEAN, hz) * np.array([[.5], [-.5]]))
    colour /= np.sqrt(1 + (43 / (hz + 1)) ** 12 + (hz / 15300) ** 40)
    colour *= makeup_ratio(-2.5 * (1 + np.tanh((hz - 8150) / 120)))
    z = rfft(dry, size) * colour
    mid = z.mean(0)
    z = mid + (z - mid) / np.sqrt(1 + (90 / (hz + 1)) ** 4)
    return irfft(z, size)[:, :N]


def smoothed(x, seconds):
    keep = np.exp(-1 / (seconds * SR))
    return signal.lfilter([1 - keep], [1, -keep], x)


LIMIT_DB, LIMIT_SHARE, RELEASE_DB_PER_S = -28.0, 0.62, 550.0


def limiter(x):
    power_db = 10 * np.log10(smoothed((x ** 2).mean(0), .003) + 1e-12)
    fall_db = np.arange(N) * RELEASE_DB_PER_S / SR
    held_db = np.maximum.accumulate(power_db + fall_db) - fall_db
    over_db = np.maximum(held_db - LIMIT_DB, 0)
    return x / makeup_ratio(LIMIT_SHARE * smoothed(over_db, .002))


CEILING = 0.7


def overload(x):
    size = next_fast_len(N)
    hz = np.fft.rfftfreq(size, 1 / SR)
    z = rfft(CEILING * np.tanh(x / CEILING), size)
    return irfft(z / np.sqrt(1 + (hz / 15600) ** 200), size)[:, :N]


def low_pass(x):
    return signal.sosfilt(signal.butter(12, 16480, fs=SR, output="sos"), x)


def record(dry):
    mix = overload(limiter(ports(dry)))
    return low_pass(mix)


dry = scene()
out = record(dry)
bounce(out)
```